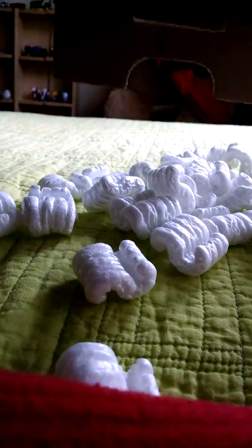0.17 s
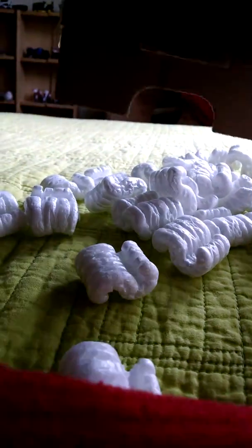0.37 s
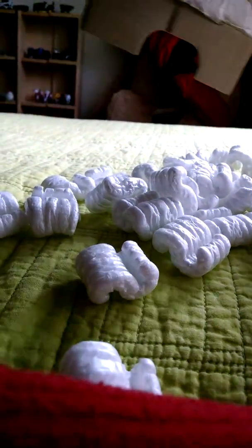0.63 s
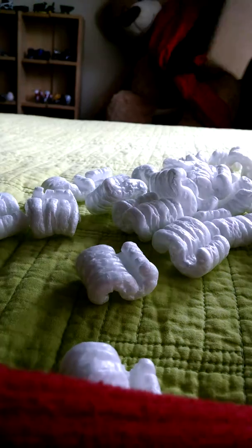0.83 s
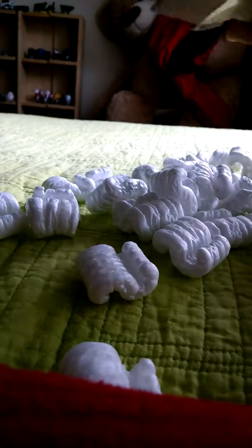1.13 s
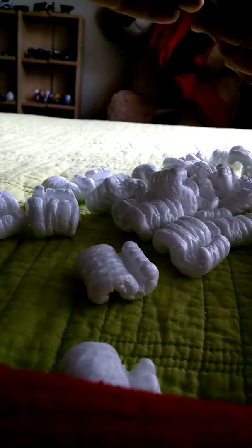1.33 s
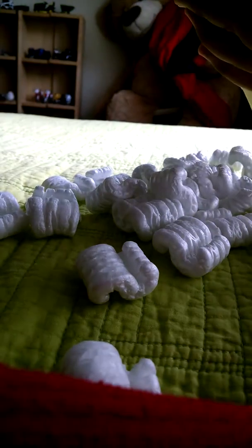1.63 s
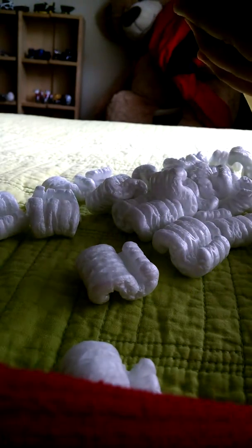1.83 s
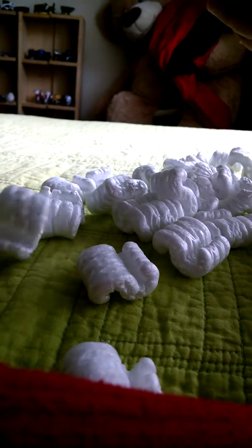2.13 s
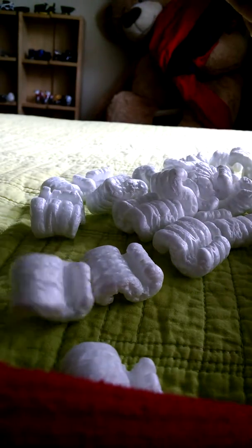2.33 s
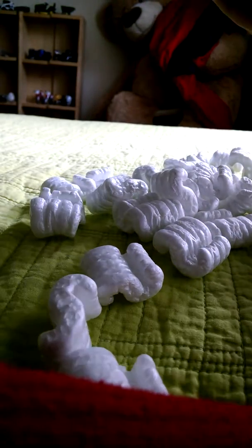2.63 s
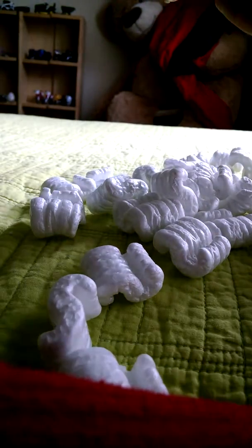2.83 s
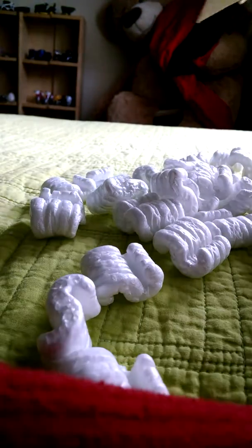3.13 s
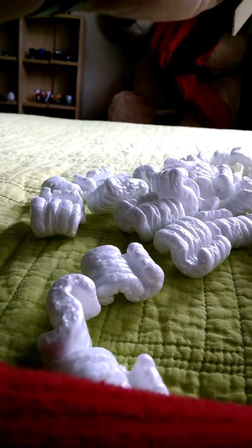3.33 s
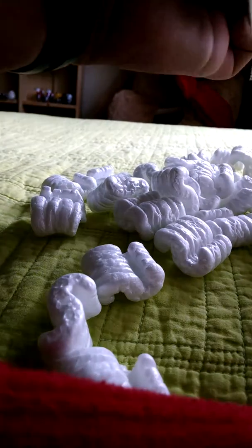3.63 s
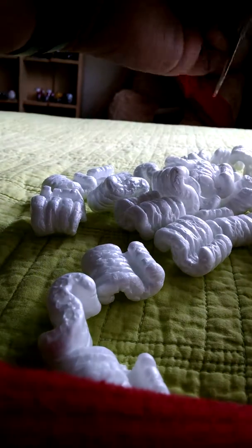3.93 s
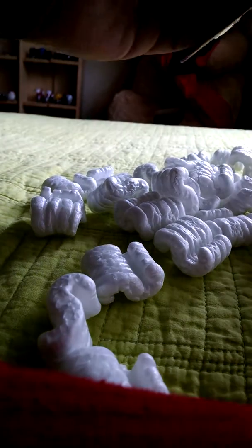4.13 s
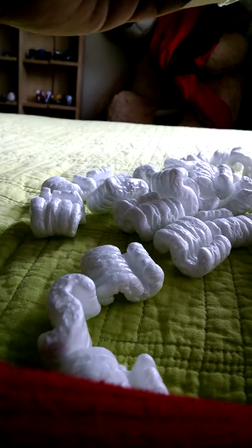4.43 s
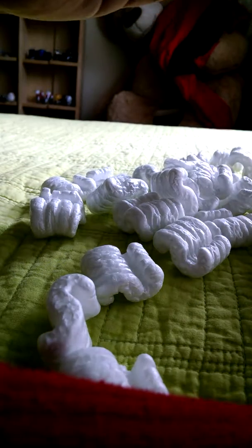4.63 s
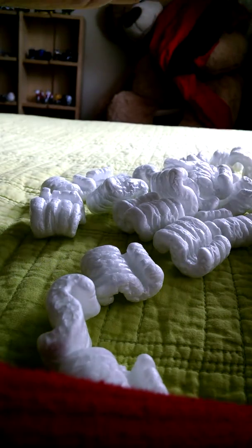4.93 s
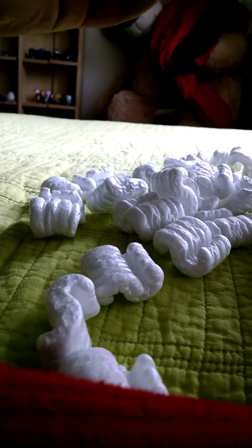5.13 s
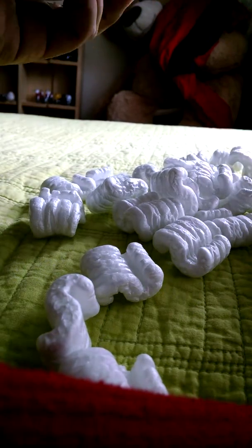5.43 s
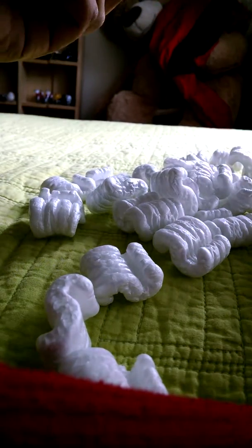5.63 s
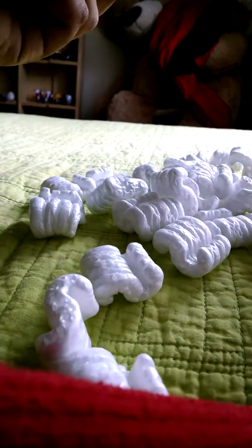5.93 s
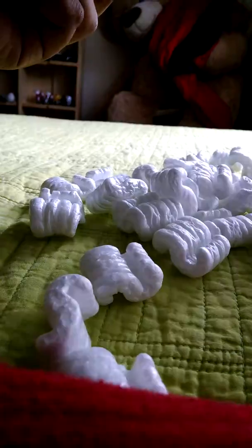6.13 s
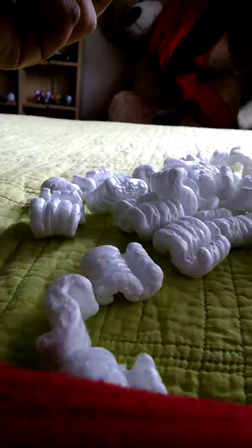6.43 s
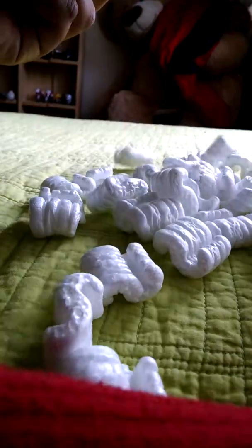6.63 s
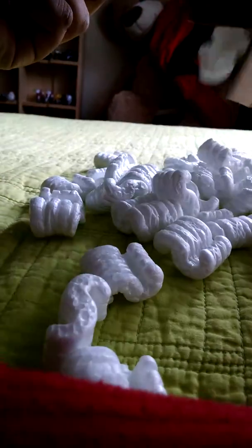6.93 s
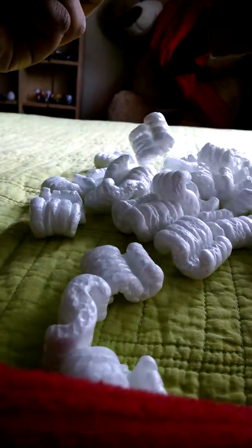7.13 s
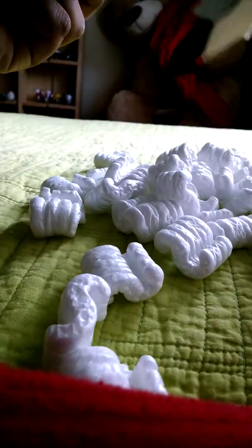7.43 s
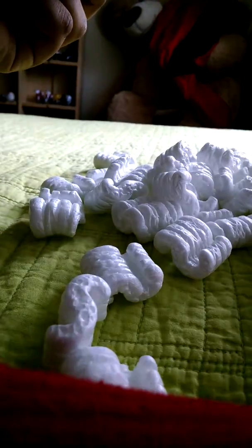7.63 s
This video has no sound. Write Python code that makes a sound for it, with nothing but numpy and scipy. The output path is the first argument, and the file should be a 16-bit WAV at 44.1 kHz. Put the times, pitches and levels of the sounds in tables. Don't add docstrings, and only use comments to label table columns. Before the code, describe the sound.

Hollow cardboard thumps and scratchy foam rubbing beside the microphone, a faint bird chirp, then a dry patter of foam peanuts tumbling out in a quiet bedroom.

```python
import sys
import numpy as np
from scipy import signal
from scipy.fft import rfft, irfft, next_fast_len
from scipy.io import wavfile

SR = 44100
rng = np.random.default_rng(int(sys.argv[2]) if len(sys.argv) > 2 else 0)


def to_wav(sig):
    pcm = np.clip(np.atleast_2d(sig), -1, 1) * 32767
    pcm = np.round(pcm).astype(np.int16)
    wavfile.write(sys.argv[1], SR, pcm.T)


def gain_from_db(level_db):
    decades = np.asarray(level_db, float) / 20
    return 10 ** decades


N = 343142
SIZE = next_fast_len(N + SR // 10, real=True)
HZ = np.fft.rfftfreq(SIZE, 1 / SR)


def evened(x):
    return x / np.sqrt(np.mean(x ** 2) + 1e-20)


def read(points, hz):
    f, value = np.transpose(points)
    return np.interp(np.log(hz + 1), np.log(f + 1), value)


def add(mix, s, sound):
    part = mix[..., max(round(s * SR), 0):][..., :sound.shape[-1]]
    part += sound[..., :part.shape[-1]]


def filtered(x, response):
    return irfft(rfft(x, SIZE) * response, SIZE)[..., :N]


def late(ms):
    return np.exp(-2j * np.pi * HZ * ms / 1000)


def drift(hz):
    return evened(filtered(rng.standard_normal(N), 1 / (1 + (HZ / hz) ** 2)))


def grains(per_s, spread_db):
    swell_db = spread_db * np.minimum(rng.exponential(1, N), 3.8)
    size = gain_from_db(swell_db) * np.clip(rng.standard_normal(N), -2.2, 2.2)
    return size * (rng.random(N) < per_s / SR)


def to_ports(near, far, lag_ms):
    # frequency in Hz, level in dB.
    shade_curve = [(60, -1.5), (120, 3), (300, -0.5), (1000, 2), (2000, 3.5), (6000, -5.5), (9000, -3),
                   (15000, -3)]
    return np.array([near, filtered(far, gain_from_db(read(shade_curve, HZ)) * late(lag_ms))])


def air():
    # frequency in Hz, level in dB per Hz.
    wash_curve = [(25, -7), (42, -10), (53, 10), (70, -20), (170, -7.5), (330, 6), (480, -6.5), (900, -21),
                  (1200, -30), (2500, -23.5), (4000, -39), (9000, -27), (12000, -21.5), (15500, -18.5)]
    # frequency in Hz, correlation from 0 to 1.
    likeness_curve = [(30, 0.97), (120, 1), (400, 0.8), (1200, 0.48), (3000, 0.15), (8000, 0.041)]
    wash_db, hum_db, hum_hz = -47, -48.5, 120
    a, b = rng.standard_normal((2, N))
    same = np.clip(read(likeness_curve, HZ), 0, 1)
    colour = gain_from_db(read(wash_curve, HZ))
    near = filtered(a, colour)
    far = filtered(a, colour * same) + filtered(b, colour * np.sqrt(1 - same ** 2))
    swell = gain_from_db(wash_db + 0.5 * drift(23.0)) / np.std(near)
    phase = 2 * np.pi * hum_hz * np.arange(N) / SR + 0.53 * drift(11.6)
    hum = gain_from_db(hum_db + 0.21 * drift(0.59)) * np.sin(phase)
    return to_ports(swell * near + hum, swell * far + hum, lag_ms=0.041)


def bird():
    # time in seconds, pitch in Hz, level in dB.
    chirp_tables = [
        [(5.025, 3700, -89), (5.045, 4550, -81), (5.08, 3570, -69)],
        [(5.58, 3680, -68), (5.603, 3900, -54), (5.617, 4300, -38), (5.634, 4270, -39), (5.66, 3500, -56)],
    ]
    out = np.zeros(N)
    for rows in chirp_tables:
        s, hz, db = np.transpose(rows)
        t = np.arange(s[0], s[-1], 1 / SR)
        tone = np.sin(2 * np.pi * np.cumsum(np.interp(t, s, hz)) / SR)
        add(out, s[0], gain_from_db(np.interp(t, s, db)) * tone * signal.windows.tukey(len(t), 0.2))
    out *= gain_from_db(-11 + 4 * drift(150))
    return to_ports(out, out, lag_ms=0.069)


def puffs():
    # centre in seconds, peak in dB, width in ms.
    puff_table = [(0.346, -28, 3.9), (0.818, -23.5, 10), (0.876, -34, 11.4), (0.916, -24, 17),
                  (0.964, -31, 15), (1.649, -25, 11), (1.689, -22, 12), (1.761, -25, 15), (1.963, -36, 6.2),
                  (2.001, -30, 12), (2.052, -24.5, 14), (2.114, -18.5, 7.9), (2.169, -26, 14),
                  (2.225, -26, 12), (2.308, -34, 12), (2.351, -31, 2.6), (3.832, -41, 5),
                  (6.775, -17.5, 13.7)]
    t, out = np.arange(-2600, 2600) / SR, np.zeros((2, N))
    for s, db, width_ms in puff_table:
        u = t * 2000 / width_ms
        add(out[0], s + t[0], -gain_from_db(db - 9.5) * (1 - u ** 2) * np.exp(-u ** 2 / 2))
    return out


def cracks():
    # start in seconds, peak in dB, time to fall 60 dB in ms.
    crack_table = [(.0395, -38, 8), (.218, -36, 8), (.4675, -27, 6), (0.536, -29, 7), (0.841, -18, 10),
                   (2.225, -36, 6), (2.459, -38, 6), (2.944, -32, 6), (3.814, -28, 8), (3.979, -30, 6),
                   (4.145, -37, 14), (5.105, -36, 6), (6.347, -29, 4.5), (6.4245, -39, 6), (6.797, -28, 7),
                   (6.8805, -32, 8), (7.0195, -32, 6), (7.0475, -33, 6), (7.121, -35, 8.6)]
    # frequency in Hz, level in dB per Hz.
    crack_curve = [(500, -27), (1500, -20), (2600, -9), (5000, 4), (7500, -1), (12000, -2), (16000, -10)]
    t_ms, out = np.arange(600) / SR * 1000, np.zeros(N)
    for s, db, t60_ms in crack_table:
        burst = rng.uniform(-1.1, 1, len(t_ms))
        add(out, s, gain_from_db(db - 60 * t_ms / max(t60_ms, 2)) * burst)
    out = filtered(out, gain_from_db(read(crack_curve, HZ)))
    return to_ports(out, gain_from_db(-14) * out, lag_ms=0.27)


def knocks():
    # start in seconds, peak in dB, pitch in Hz.
    wall_blows = [(0.039, -23, 219), (.2175, -17.5, 210), (0.363, -17, 345), (0.4667, -25.5, 255),
                  (0.5357, -16, 303), (0.539, -30.5, 80.6), (2.344, -26, 75.5), (3.02, -32.5, 69.4),
                  (3.82, -32.5, 78.4), (3.98, -31, 80), (0.805, -27, 326), (2.063, -25, 284),
                  (2.186, -20.5, 330), (2.267, -15, 250), (2.342, -20.5, 300), (2.46, -19, 236),
                  (2.591, -26.5, 280), (2.996, -27, 357), (3.034, -21.5, 299), (3.151, -29, 354),
                  (3.199, -24, 414), (3.279, -19.5, 352), (3.475, -16.5, 214), (4.118, -45, 358),
                  (4.247, -22.5, 377), (4.476, -21.5, 308), (4.678, -21.5, 322), (5.105, -24, 310),
                  (5.186, -27.5, 375), (5.9, -24.5, 319), (6.192, -35, 384), (6.298, -19, 360),
                  (6.501, -30, 370), (6.527, -29, 357)]
    # start in seconds, peak in dB, pitch in Hz.
    flap_taps = [(.074, -29, 940), (.125, -18.5, 523), (.363, -15.5, 835), (0.841, -17.5, 875),
                 (1.335, -27.5, 970), (1.567, -30, 670), (1.714, -34, 674), (2.22, -22, 544),
                 (3.82, -20.5, 900), (6.3465, -20.5, 904), (6.348, -20, 1390), (6.4245, -24, 704),
                 (0.8397, -12, 3330), (0.839, -12, 3880), (3.979, -17, 3860), (5.106, -19.5, 3380),
                 (5.514, -35, 4180), (6.909, -24, 745), (7.12, -28.5, 725), (.016, -35, 813),
                 (.04, -22, 670), (.104, -28.5, 1310), (.182, -28.5, 750), (.219, -28, 930),
                 (.24, -32, 623), (.339, -30, 674), (0.399, -32, 875), (.437, -35, 650), (.467, -21.5, 694),
                 (.51, -26, 830), (.5365, -24, 860), (0.899, -32, 1420), (4.146, -26, 2550),
                 (4.176, -29, 910), (4.19, -34, 880), (5.52, -29, 4120), (5.52, -43, 2920),
                 (6.498, -31, 800), (6.556, -25, 830), (6.566, -23, 970), (6.571, -21, 750),
                 (6.576, -23, 910), (6.581, -27, 660), (6.7, -38, 784), (6.719, -41, 1320),
                 (6.865, -32.5, 880), (6.931, -27, 1470), (7.05, -31, 750)]
    t, out = np.arange(6000) / SR, np.zeros(N)
    onset = 1 - np.exp(-t / 0.00059)
    for s, db, hz in wall_blows + flap_taps:
        t60 = 0.049 * (hz / 300) ** -0.57 * gain_from_db(-0.27 * (db + 27.5))
        detune = (1, *rng.uniform(0.845, 1.1, 2))
        ring = np.zeros(len(t))
        for ratio, mode_db, shift in zip((1, 1.8, 3.3), (0, -5, -15), detune):
            decay_db = mode_db * (1 + hz / 1500) - 60 * t * ratio ** 0.45 / max(t60, 0.01)
            ring += gain_from_db(decay_db) * np.sin(2 * np.pi * hz * ratio * shift * t)
        add(out, s, gain_from_db(db - 3.0) * ring * onset)
    return to_ports(out, out, lag_ms=0.23)


def with_skids(contacts, rise_fall_ms, haste):
    rows = []
    for s, db, top, rasp in contacts:
        lengths = np.array(rise_fall_ms) * gain_from_db(-haste * (db + 37.5))
        rows += [(s, db, *lengths, top, rasp)]
        for a, b, c in rng.uniform(-0.91, 1, (3, 3)):
            rows += [(s + 0.027 * (a + 0.5), db - 18 + 4 * b, *lengths, top + 8 * c, rasp)]
    return rows


def strokes():
    # peak time in seconds, peak in dB, rise in ms, fall in ms, card rasp in dB.
    card_drags = [(.039, -45.5, 1.7, 25, 15), (0.252, -46, 12, 13, 12), (0.429, -42, 22, 42, 9),
                  (0.588, -34.5, 3, 15, -10), (0.604, -31.5, 12, 24, -1.5), (0.718, -39, 91, 23, -1),
                  (.989, -43.5, 21, 19, -4), (1.123, -44, 24, 23, -2), (1.364, -44.5, 69, 140, 2),
                  (1.439, -40.5, 14, 10, 5), (1.471, -45, 14, 156, 0), (1.573, -51.5, 9.8, 6.2, 10.5),
                  (2.342, -36, 15, 15.4, 1.5), (2.457, -43.5, 1.5, 12.5, 14.5), (3.001, -36.5, 13, 30, 0),
                  (3.231, -38.5, 24, 8.3, 4.5), (3.835, -25.5, 6.8, 1.3, 3.5), (3.85, -45, 8, 7.9, 12.5),
                  (3.907, -37.5, 180, 17, -2), (5.45, -53, 12, 15, 11.5), (.13, -52.5, 4, 21, 17.5),
                  (5.194, -42, 8.3, 33, 6.5), (5.294, -51.5, 30, 30, 10.5), (5.467, -56.5, 49, 7.9, 11.5),
                  (6.198, -35.5, 7.9, 2.1, 1.5), (6.215, -33.5, 21, 33.6, -2), (6.568, -39.5, 21, 12, 11.5)]
    # peak time in seconds, peak in dB, rise in ms, fall in ms, top end in dB.
    foam_slides = [(1.232, -41.5, 6.8, 28, 1.5), (1.793, -54, 53, 47, 14), (2.537, -32, 16, 2.9, 6),
                   (2.652, -36, 48, 98, 0), (2.71, -29, 8.5, 57, 5), (2.81, -37, 43, 9.9, 13),
                   (3.335, -30.5, 13, 34, 5), (3.38, -27.5, 27, 15, 0), (3.41, -37, 22, 22, 6),
                   (3.45, -30, 38, 23, -2), (3.476, -22.5, 3, 38, 4.5), (3.543, -18.5, 61, 55, 7.5),
                   (3.594, -24, 2.6, 20, 4), (3.638, -31.5, 19, 27, 5), (3.739, -36, 4, 6.5, 8),
                   (3.816, -20.5, 8, 4, 4.5), (3.979, -29.5, 9, 8, -3.5), (.447, -41, 16, 8.6, -14),
                   (5.108, -35, 2.9, 24, 0), (5.517, -46.5, 6.9, 13, -13.5), (6.146, -45.5, 45, 19, 1),
                   (6.561, -38, 22, 9.8, -8), (6.605, -42, 13, 1.6, 4), (6.895, -38.5, 22, 16, -6),
                   (6.96, -36.5, 34, 12, 2)]
    # time in seconds, peak in dB, top end in dB, card rasp in dB.
    crease_snaps = [(.218, -45.5, -13.5, 18.5), (.4495, -34.5, -19, -6), (.4684, -37.5, -10, 14),
                    (.5378, -34.5, -2, 15.5), (.822, -38, 18, -15), (.828, -47, -10, -15),
                    (.8416, -17.5, 5, -2), (1.2931, -42.5, -3, 3), (2.1726, -41, 2, -23),
                    (2.2249, -31, -4, -0.5), (2.2654, -47, -18, 8.5), (2.3756, -37, 11, -19),
                    (2.5103, -30, 1, -16), (2.9343, -33, 12, 6), (2.9448, -19.5, 12, -25),
                    (3.1683, -40.5, 5, 2), (3.4591, -34, -16, -10), (3.9805, -20, -10.5, -12),
                    (4.1466, -39.5, -22, 13), (4.178, -51, -1, 17.5), (3.9445, -35, -3, -11),
                    (4.2035, -43, 7, 1), (4.217, -39, 9, -21), (4.234, -49, 14, -15), (4.2543, -44, 9, -5),
                    (4.2863, -35, 6, 0)]
    # time in seconds, peak in dB, top end in dB, card rasp in dB.
    peanut_landings = [(6.2902, -36, 1, 0), (6.3486, -30.5, -10, 3.5), (6.4254, -28, -2, -10),
                       (6.4354, -33, 12, 7.5), (6.4449, -24, 1, -13), (6.4898, -26, 1, -4.5),
                       (6.5287, -29, 0, -6), (6.5521, -20.5, -9, -24), (6.561, -24, -13, -15),
                       (6.3965, -42, -10, -13), (6.569, -29, 8, -10), (6.597, -27.5, 2, -6),
                       (6.603, -31, 10, -11), (6.6115, -28.5, 12, -5), (6.6753, -41, 16, -19),
                       (6.7013, -34, 16, -9), (6.7083, -28, -5, -23), (6.7202, -29.5, 4, -5),
                       (6.7497, -36, 3, -9), (6.7786, -34, 3, -18), (6.7861, -34, 16, 0),
                       (6.7976, -24, 5, -13), (6.812, -35, 14, -23), (6.8824, -25, 3, -6.5),
                       (6.9068, -26, 0, -23), (6.9327, -21, 6, -4), (7.0205, -23.5, 9, -36),
                       (7.0485, -27.5, -2, -13), (7.1223, -30, 7, -0.5), (7.3882, -45.5, 19, -12),
                       (7.485, -38.5, 17, -18)]
    rows = [(*row, -0.31 * rasp, rasp) for *row, rasp in card_drags]
    rows += [(*row, top, -6.5 - 0.97 * top) for *row, top in foam_slides]
    rows += with_skids(crease_snaps, rise_fall_ms=(2.4, 5.2), haste=0.6)
    rows += with_skids(peanut_landings, rise_fall_ms=(2.3, 2.3), haste=0.16)
    return rows


def ticks():
    half = SR // 5
    t_ms, power = np.arange(-half, half) / SR * 1000, np.zeros((3, N))
    bend = np.where(t_ms < 0, 1.6, 1.75)
    for s, db, rise_ms, fall_ms, top_db, card_db in strokes():
        length_ms = np.maximum(np.where(t_ms < 0, rise_ms, fall_ms), 0.3)
        shape_db = -8 * abs(t_ms / length_ms) ** bend
        layers_db = db + np.array([[-3.5 - top_db / 2], [top_db / 2], [card_db]])
        skip = max(half - round(s * SR), 0)
        add(power, s + t_ms[0] / 1000, gain_from_db(2 * (layers_db + shape_db))[:, skip:])
    return power


def rubbing():
    # time in seconds, hiss in dB, box rumble in dB,
    # far microphone in dB, lean toward the phone's end in dB.
    rub_table = [(0.0, -51, -42, 8.5, 2.5), (1.32, -50, -52, 5, 1), (2.1, -54.5, -51.5, 6.5, 1.5),
                 (2.62, -43.5, -50.5, -2.5, 2), (3.29, -49, -51, 5, 1), (3.47, -44.5, -50.5, 7, 0),
                 (4.18, -38.5, -46, 1, 0.5), (4.57, -54.5, -49.5, 4, -1.5), (5.89, -59.5, -56.5, 8, 3.5),
                 (6.61, -46, -47, -11, 3.5), (7.32, -54.5, -55, 4.5, -0.5), (7.78, -49.5, -52.5, 6, 3.5)]
    # frequency in Hz, level in dB per Hz.
    foam_curve = [(1500, -39), (2050, -10), (2600, -9.5), (3500, 2), (5200, 2.5), (6600, 4), (7800, -2),
                  (9000, 2), (11000, 1.5), (13000, -2), (14900, -2), (15200, -9.5)]
    card_curve = [(300, -0.5), (600, -1), (900, 0), (1450, -2), (2050, -16.5), (2600, -5), (4000, -36)]
    box_curve = [(45, -56), (100, -1.5), (200, -3.5), (330, 6), (500, -11), (850, -9.5), (1150, -14),
                 (1450, -12), (2200, -33.5), (3500, -31.5)]
    s, *columns = np.transpose(rub_table)
    hiss_db, body_db, far_db, lean_db = (np.interp(np.arange(N) / SR, s, c) for c in columns)
    pressed = ticks()
    idle = gain_from_db(2 * (hiss_db + np.array([[-3.5], [-3.2], [-9]])))
    upper = 1 / (1 + (7500 / (HZ + 1)) ** 6)
    foam_colour, box_colour = gain_from_db(read(foam_curve, HZ)), gain_from_db(read(box_curve, HZ))
    colours = np.array([foam_colour * (1 - upper), foam_colour * upper, gain_from_db(read(card_curve, HZ))])
    lean = gain_from_db(np.arange(-1, 2)[:, None] * lean_db)
    shares = lean / np.sqrt((lean ** 2).mean(0))
    out = np.zeros((2, N))
    for lag_ms, share in zip((0.26, 0.33, 0.38), shares):
        slips = grains(per_s=7300, spread_db=1.0)
        clumps_db = 2.1 * drift(99) + 3.3 * drift(17)
        hiss, top, card = np.sqrt(pressed * gain_from_db(0.9 * clumps_db) + idle * gain_from_db(2 * clumps_db))
        lumps = gain_from_db(1.8 * np.interp(HZ, np.linspace(0, SR / 2, 32), rng.standard_normal(32)))
        foam, fizz, rasp = map(evened, filtered(slips, colours * lumps))
        bright = hiss * foam + top * fizz
        dull = gain_from_db(-0.04) * card * rasp
        dull += gain_from_db(body_db + 7.0) * evened(filtered(grains(per_s=700, spread_db=4.5), box_colour))
        shaded = hiss * foam + gain_from_db(-11) * top * fizz
        under = filtered(shaded, 1 / (1 + (HZ / 3300) ** 8))
        far = gain_from_db(4.5) * under + gain_from_db(far_db) * (shaded - under) + dull
        out += share * to_ports(bright + dull, far, lag_ms)
    return gain_from_db(-9.5) * out


def walls(x):
    # frequency in Hz, time to fall 60 dB in seconds.
    decay_curve = [(200, 0.2), (1000, 0.18), (5000, 0.083), (15000, 0.047)]
    taps = np.zeros((2, SR // 2))
    at = np.arange(120, SR // 2 - 20, 20)
    at = at + rng.integers(0, 20, (2, len(at)))
    np.put_along_axis(taps, at, rng.choice([-1., 1.], at.shape), 1)
    taps[1] = 0.32 * taps[0] + 1.0 * taps[1]
    hz, t, z = signal.stft(taps, SR, nperseg=256)
    tail = signal.istft(z * gain_from_db(-60 * t / read(decay_curve, hz)[:, None]), SR, nperseg=256)[1]
    return signal.fftconvolve(x[None], tail / np.linalg.norm(tail[0]), axes=1)[:, :N]


def scene():
    mouth = 1 - 0.13 * late(0.92) / (1 + (HZ / 5500) ** 4)
    close = filtered(rubbing(), mouth) + knocks() + cracks() + bird()
    return close + gain_from_db(-14) * walls(close[0]) + puffs() + air()


def joint_stereo(x):
    band_edges = np.r_[0, 96:144:12, 144:192:16, 196, 216, 240, 264, 292, 320, 352, 384]
    sum_and_difference = np.array([x[0] + x[1], x[0] - x[1]]) / 2
    z = signal.stft(sum_and_difference, SR, nperseg=2048, noverlap=1024)[2]
    power = np.add.reduceat(abs(z) ** 2, band_edges, axis=1)
    total = power[:, 1:].sum((0, 1))
    calm = total < gain_from_db(26) * np.roll(total, 1)
    margin = gain_from_db(np.where(band_edges < 190, -3, -6))[:, None]
    weak = (power < power[::-1] * margin) & calm
    weak[:, [0, -1]] = False
    z *= np.repeat(~weak, np.diff(np.r_[band_edges, z.shape[1]]), axis=1)
    mid, side = signal.istft(z, SR, nperseg=2048, noverlap=1024)[1][:, :N]
    return np.array([mid + side, mid - side])


def roll_off(x):
    return signal.sosfilt(signal.butter(12, 16650, fs=SR, output="sos"), x)


def record(dry):
    # frequency in Hz, level in dB.
    cross_curve = [(30, -2.5), (110, -1.5), (1300, -2.5), (2500, -5), (5000, -6.5), (8000, -12.5),
                   (11000, -7), (15000, -42)]
    aimed = dry - filtered(dry[::-1], gain_from_db(read(cross_curve, HZ)) * late(0.3802))
    lift = np.sqrt(1 + (500 / np.maximum(HZ, 100)) ** 2) / (1 + (14 / (HZ + 1)) ** 2)
    edge = 1 / (1 + (HZ / 15600) ** 400)
    mix = joint_stereo(filtered(aimed, lift * edge))
    return roll_off(mix)


dry = scene()
out = record(dry)
to_wav(out)
```